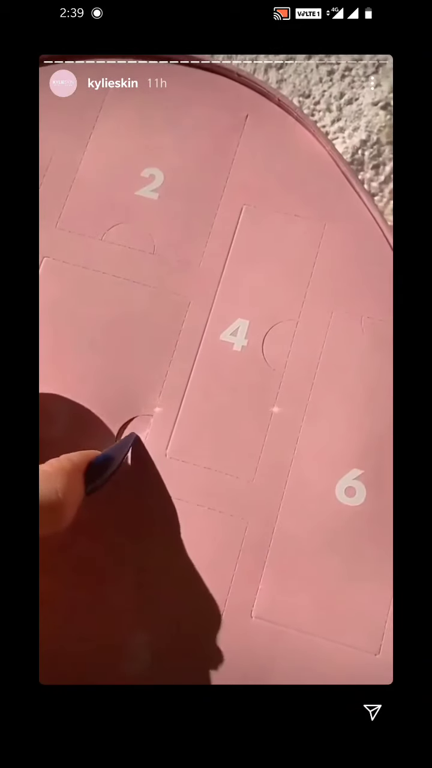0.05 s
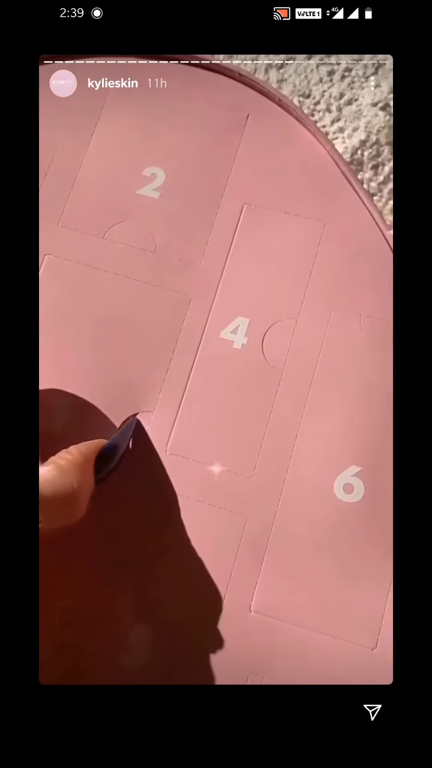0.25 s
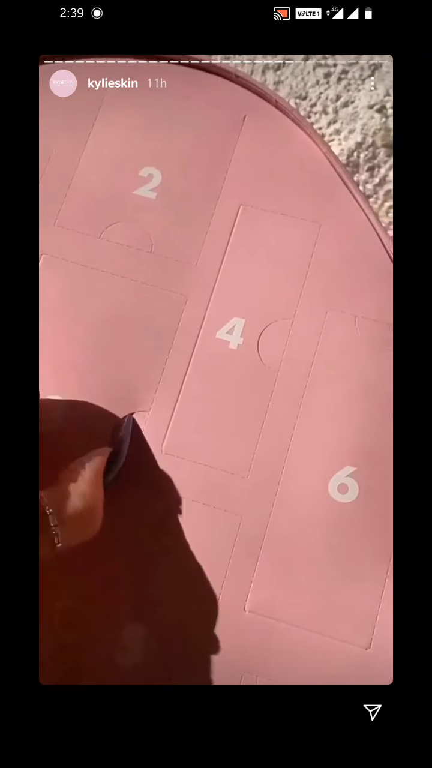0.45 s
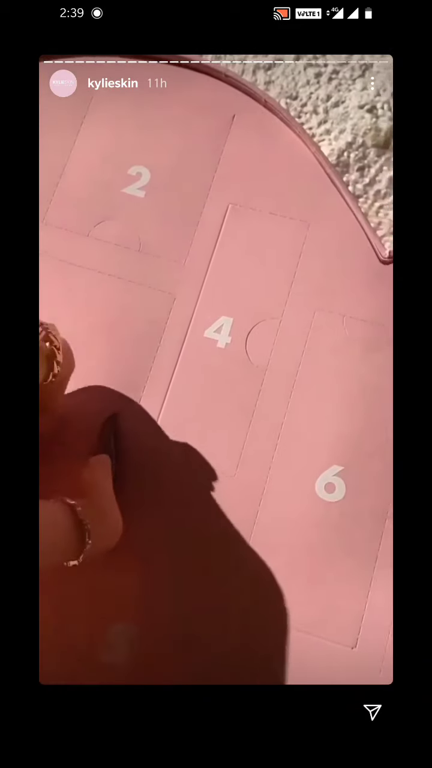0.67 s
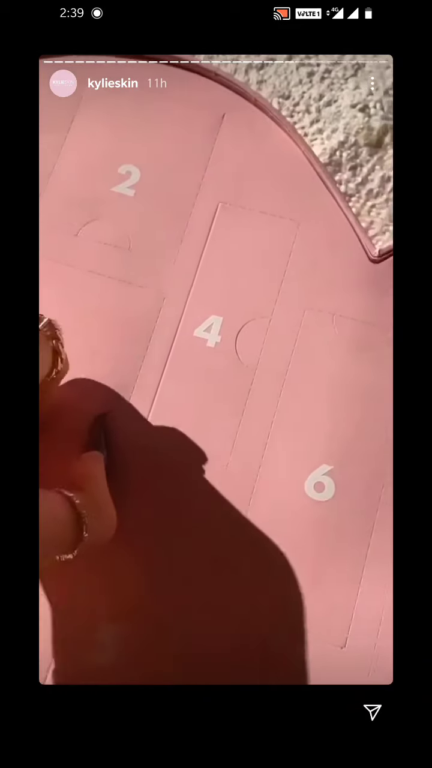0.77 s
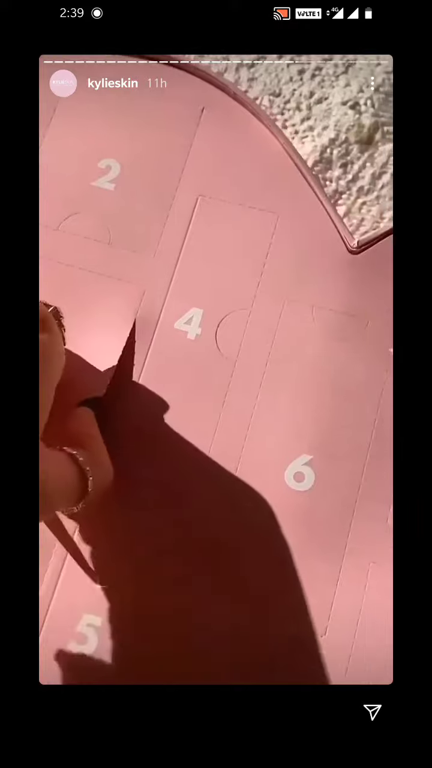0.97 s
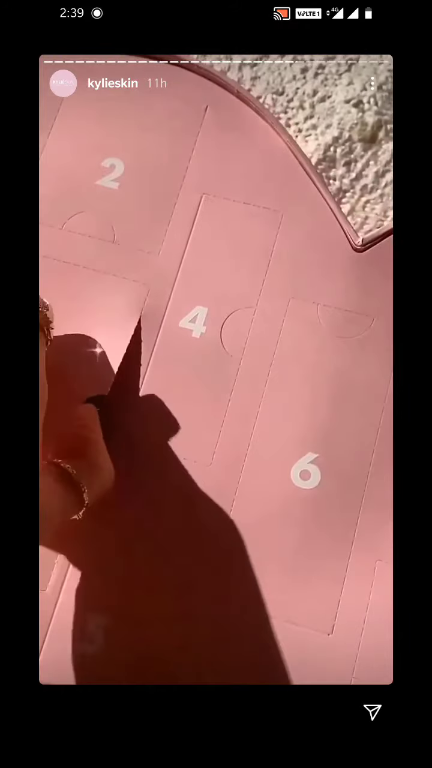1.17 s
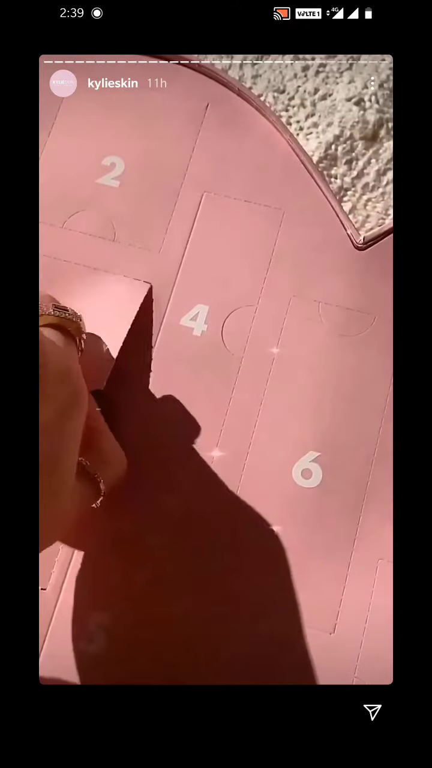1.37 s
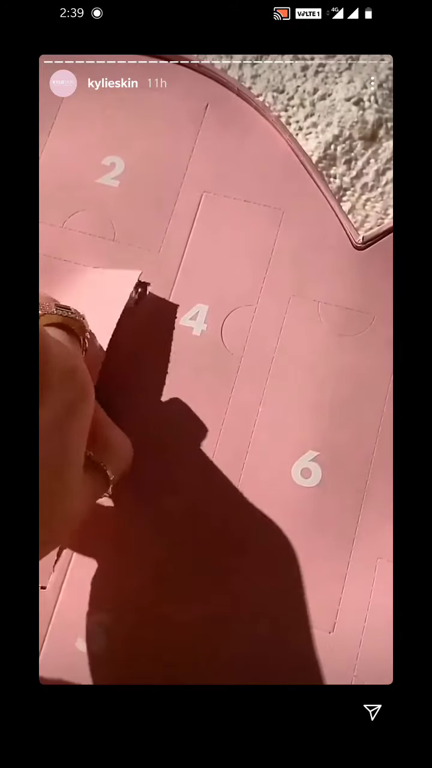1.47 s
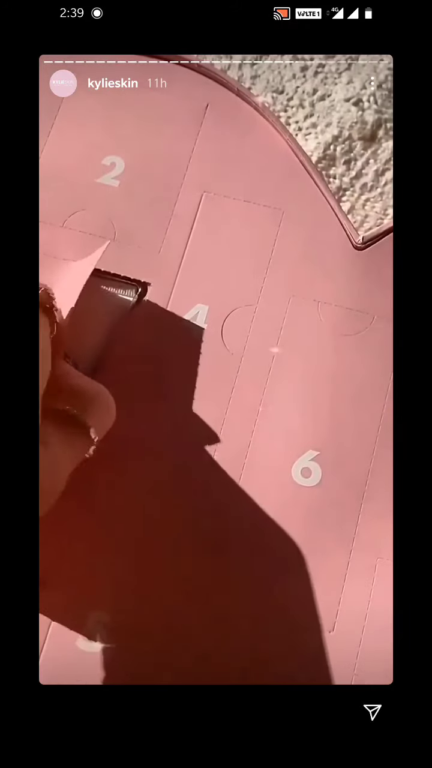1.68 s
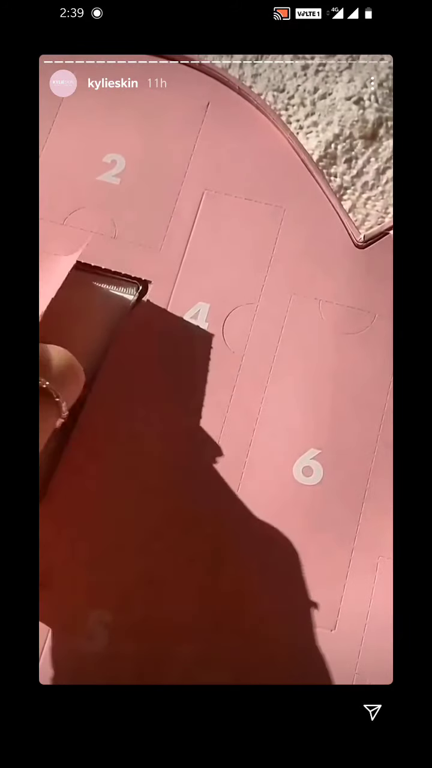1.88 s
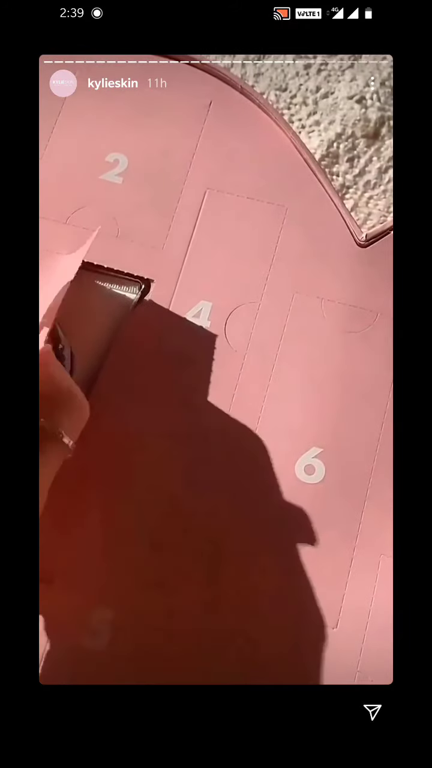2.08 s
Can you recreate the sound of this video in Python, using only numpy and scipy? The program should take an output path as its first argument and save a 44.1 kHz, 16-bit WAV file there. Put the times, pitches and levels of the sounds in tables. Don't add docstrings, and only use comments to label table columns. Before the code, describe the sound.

A fingernail pries up a cardboard flap; dry snaps come in two tight bursts, the second loudest, followed by one lone pop, soft skin rub and tiny clicks, over faint room air and hum, phone microphone close.

```python
import sys
import numpy as np
from scipy import signal
from scipy.fft import rfft, irfft, next_fast_len
from scipy.io import wavfile
from scipy.ndimage import map_coordinates

SR = 44100
rng = np.random.default_rng(int(sys.argv[2]) if len(sys.argv) > 2 else 0)


def log_audio(samples):
    frames = np.atleast_2d(samples).T
    limited = np.clip(frames, -1, 1)
    pcm = np.round(limited * 32767).astype(np.int16)
    wavfile.write(sys.argv[1], SR, pcm)


def invert_db(x):
    u = np.asarray(x, float) / 20
    return 10 ** u


N = 94109

# f/Hz, width/Hz, level/dB
CARD_MODES = [(2200, 415, -2), (3640, 460, -1), (4140, 580, 1), (4940, 630, -3), (6430, 720, -6.5),
              (8000, 1060, -4.5), (13000, 12000, -17.5)]
SNAP_LEAD_S, SNAP_LEN = 0.006, 6000


def unit_rms(x):
    return x / np.sqrt(np.mean(x ** 2) + 1e-20)


def unit_peak(x):
    return x / np.abs(x).max()


def along(points, hz):
    f, v = np.transpose(points)
    return np.interp(np.log(hz + 1), np.log(f + 1), v)


def wobble(knots_per_s):
    knots = rng.standard_normal(int(N * knots_per_s / SR) + 4)
    return map_coordinates(knots, [np.arange(N) * knots_per_s / SR])


def filtered(x, response):
    m = next_fast_len(len(x) + 8192)
    return irfft(rfft(x, m) * response(np.fft.rfftfreq(m, 1 / SR)), m)[:len(x)]


def resonances(modes):
    def response(f):
        total = 0
        for k, (centre_hz, width_hz, db) in enumerate(modes):
            damping = 1j * f * width_hz
            total = total + (-1) ** k * invert_db(db) * damping / (centre_hz ** 2 - f * f + damping)
        return total
    return response


def ring(hz, t60_s, rise_s, t):
    return invert_db(-60 * t / t60_s) * np.sin(2 * np.pi * hz * t) * (1 - np.exp(-t / rise_s))


def ambience():
    # f/Hz, density/dB
    air_tone = [(20, 3), (45, -10), (90, -12.5), (160, -17), (380, -23.5), (480, -30), (2100, -43.5),
                (16000, -56)]
    # f/Hz, rms level/dB
    hum_tones = [(60, -67), (119.5, -62), (239, -83), (359, -80.5)]
    # f/Hz, width/Hz, rms level/dB
    fan_band = (1380, 320, -81.5)
    t = np.arange(N) / SR
    air = unit_rms(filtered(rng.standard_normal(N), lambda f: invert_db(along(air_tone, f))))
    air = air * invert_db(-60.5 + 0.8 * wobble(6))
    fan_hz, fan_width_hz, fan_db = fan_band
    blades = resonances([(fan_hz, fan_width_hz, 0)])
    fan = invert_db(fan_db) * unit_rms(filtered(rng.standard_normal(N), lambda f: blades(f) ** 2))
    hum = np.zeros(N)
    for hz, db in hum_tones:
        level = invert_db(db - 1.5 + 1.93 * wobble(16.96))
        hum += level * np.sin(2 * np.pi * hz * t + 0.13 * wobble(4))
    return air + fan + hum


def room_echo(x):
    # f/Hz, t60/s
    decay = [(300, 0.41), (2000, 0.3), (4500, 0.28), (10000, 0.2)]
    hz, t, z = signal.stft(rng.standard_normal(SR // 2), SR, nperseg=256)
    tail = signal.istft(z * invert_db(-60 * t / along(decay, hz)[:, None]), SR, nperseg=256)[1]
    predelay = 150
    return signal.fftconvolve(np.pad(x, (predelay, 0)), tail / np.linalg.norm(tail))[:N]


def rubbing():
    # t/s, level/dB
    strength = [(.3, -94), (.37, -82.5), (.66, -81.5), (.74, -65), (.86, -77.5), (0.992, -72), (1.08, -86),
                (1.17, -73.5), (1.25, -65.5), (1.31, -59), (1.36, -63.5), (1.56, -68.5), (1.61, -63),
                (1.7, -78), (1.88, -79), (1.941, -64.5), (2.055, -64), (2.1, -75)]
    # f/Hz, density/dB
    tone = [(300, -18), (550, -2.5), (1300, -4.5), (2600, -11), (4300, -11.5), (8300, -14), (10500, -19),
            (16000, -22)]
    crackles_per_s, crackle_db, card_share = 500, -4, 0.54
    pops = (rng.random(N) < crackles_per_s / SR) * invert_db(np.minimum(4 * rng.exponential(size=N), 8))
    pop_decay = np.exp(-np.arange(120) / 25)
    crackle = np.convolve(pops, pop_decay)[:N] * rng.standard_normal(N)
    hiss = rng.standard_normal(N) * invert_db(1.5 * wobble(90))
    grain = hiss + invert_db(crackle_db) * unit_rms(crackle)
    points = [(200, -68)] + list(tone)
    card = resonances(CARD_MODES)
    rub = filtered(grain, lambda f: invert_db(along(points, f)) * (1 + card_share * abs(card(f))))
    s, db = np.transpose(strength)
    return invert_db(np.interp(np.arange(N) / SR, s, db)) * unit_rms(rub)


def fibre_burst(t, decay_s):
    after_s = np.maximum(t, 0)
    spikes = rng.standard_normal(len(t)) * rng.exponential(size=len(t)) ** 0.69
    creak = invert_db(-20) * np.exp(np.minimum(t, 0) / 0.002)
    give = (1 - np.exp(-after_s / 0.00019)) * np.exp(-after_s / decay_s)
    give = give + 0.083 * np.exp(-after_s / 0.0046)
    return spikes * np.where(t < 0, creak, give)


def snap(flap_hz, crack_db, box_db, burst_s):
    # f/Hz, level/dB, t60/s
    flap_modes = [(1948, -6.5, 0.0063), (885, -19.5, .015), (1480, -9, 0.0098)]
    # f/Hz, level/dB, t60/s
    box_modes = [(163, 0, .08), (355, 1, .045), (235, -2, .04), (680, -14, .03)]
    flap_t60_s, flap_rise_s, box_rise_s = 0.0098, 0.0011, 0.005
    shiver_t60_s, shiver_db = 0.06, -18
    t = np.arange(SNAP_LEN) / SR - SNAP_LEAD_S
    after_s = np.maximum(t, 0)
    crack = unit_peak(filtered(fibre_burst(t, burst_s), resonances(CARD_MODES)))
    jog_db = rng.normal(0, 2, 8)

    flap = ring(flap_hz, flap_t60_s, flap_rise_s, after_s)
    for (hz, db, t60_s), jog in zip(flap_modes, jog_db):
        flap = flap + invert_db(db + jog) * ring(hz, t60_s, flap_rise_s, after_s)
    shiver = unit_rms(filtered(rng.standard_normal(len(t)), resonances([(flap_hz, 500, 0)])))
    shiver = shiver * invert_db(shiver_db - 60 * after_s / shiver_t60_s) * (1 - np.exp(-after_s / 0.001))

    box = np.zeros(len(t))
    for (hz, db, t60_s), jog in zip(box_modes, jog_db[3:]):
        box += invert_db(db + jog) * ring(hz, t60_s, box_rise_s, after_s)
    return invert_db(-3.5) * (unit_peak(flap) + shiver) + invert_db(5 + crack_db) * crack + invert_db(7.5 + box_db) * box


def tearing():
    # t/s, peak level/dB, flap f/Hz, crack re flap level/dB, box re flap level/dB
    bridges = [(0.0467, -35.5, 1270, -20.5, -33), (0.5065, -37.5, 1150, -11.5, -8.5),
               (0.6927, -30, 1847, -8.5, -40.5), (0.6932, -28, 1193, -5, -25), (0.7036, -33, 1810, -6, -22),
               (0.7059, -28, 1110, -4, -45), (0.7247, -28.5, 1240, 0, -23.5),
               (.802, -45.5, 1140, 1.5, -11.5), (1.101, -42, 1165, -11, -18.5),
               (1.2276, -40.5, 1240, -7, -39), (1.267, -40.5, 2200, 3.5, -18.5),
               (1.2758, -32, 1260, 4.5, -38), (1.2911, -28, 2330, 1, -27), (1.2985, -23, 1404, -6, -21.5),
               (1.3085, -40, 940, 8, -40), (1.3835, -31, 2510, -5, -62), (1.3873, -23, 1200, -3.5, -24.5),
               (1.4033, -18, 1225, -7, -30.5), (1.42, -26, 1030, -14.5, -24),
               (1.4382, -19, 1360, -7.5, -17), (1.671, -24, 970, -15, -22), (1.911, -43, 950, -23, -16),
               (1.967, -41.5, 2080, -3, -8), (2.016, -46.5, 906, -3, -15)]
    # t/s, peak level/dB, crack re flap level/dB
    slips = [(.336, -54, -8.5), (.353, -61, -7), (0.811, -54.5, -0.5), (1.01, -59.5, -2), (1.074, -65, -7),
             (1.9699, -45.5, -0.5), (1.175, -54, -8.5), (1.185, -60.5, -1), (1.209, -50.5, -5),
             (1.22, -46.5, -11), (1.233, -54.5, 4.5), (1.248, -69, 6), (1.256, -62, 10),
             (1.281, -39.5, -13), (1.2936, -33, -2.5), (1.3009, -25.5, -5), (1.399, -65, 1),
             (1.586, -49.5, -12), (1.597, -51.5, -2), (1.608, -50.5, -22), (1.618, -53.5, -12),
             (1.628, -57, -26), (1.638, -48, -27), (1.698, -59, -13), (1.71, -50, 1), (1.1059, -51.5, -2),
             (1.799, -56.5, -13), (1.82, -52, -10), (1.8444, -59.5, -4.5), (2.039, -53, -5)]
    bridge_burst_s, slip_burst_s = 0.0011, 0.0022
    slip_flap_hz, slip_box_db = 1150, -33
    spread = 0.068
    breaks = [(*row, bridge_burst_s) for row in bridges]
    breaks += [(s, db, slip_flap_hz, crack_db, slip_box_db, slip_burst_s) for s, db, crack_db in slips]
    out = np.zeros(N + SNAP_LEN)
    for s, db, flap_hz, crack_db, box_db, burst_s in breaks:
        start = round((s - SNAP_LEAD_S) * SR)
        out[start:start + SNAP_LEN] += invert_db(db) * snap(flap_hz, crack_db, box_db, burst_s)
    return filtered(out[:N], lambda f: np.exp(-4j * np.pi * spread * (np.sqrt(f) - f / 200)))


def scene():
    card = filtered(tearing(), lambda f: (1j * f / (1j * f + 90)) ** 2)
    echo = invert_db(-18.5) * room_echo(card)
    return (card + echo + rubbing() + ambience())[None]


def top_cut(x):
    return signal.sosfilt(signal.butter(12, 16480, fs=SR, output="sos"), x)


def record(dry):
    # f/Hz, level/dB
    mic = [(25, -31), (45, -1), (110, 2), (8800, -1.5), (10200, -6), (15000, -3), (16000, -24),
           (16450, -54)]
    heard = filtered(dry[0], lambda f: invert_db(along(mic, f)))
    return top_cut(heard[None])


dry = scene()
out = record(dry)
log_audio(out)
```